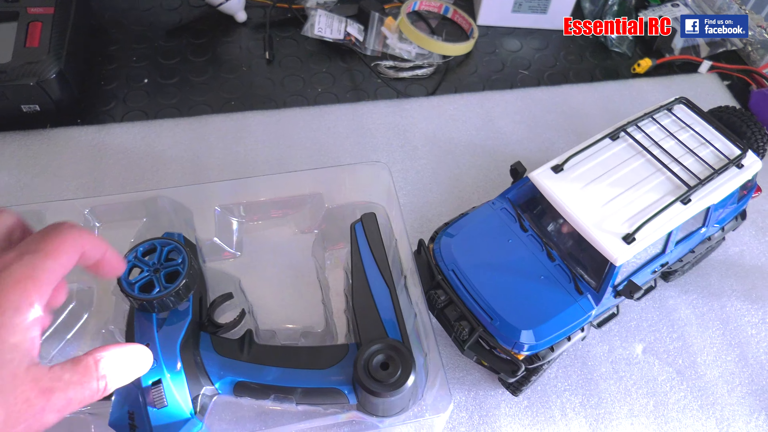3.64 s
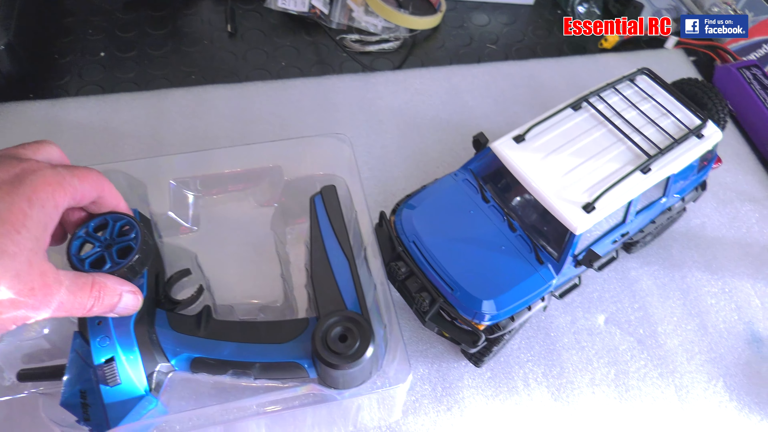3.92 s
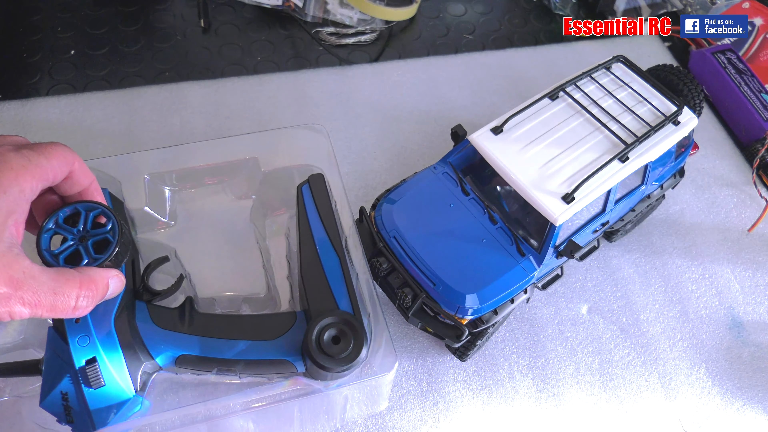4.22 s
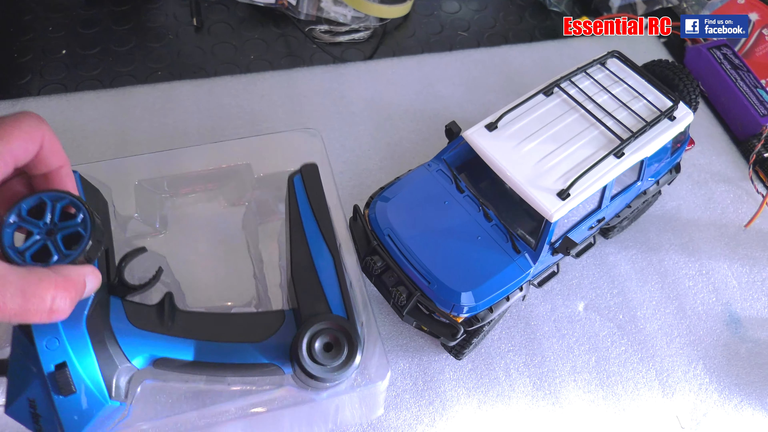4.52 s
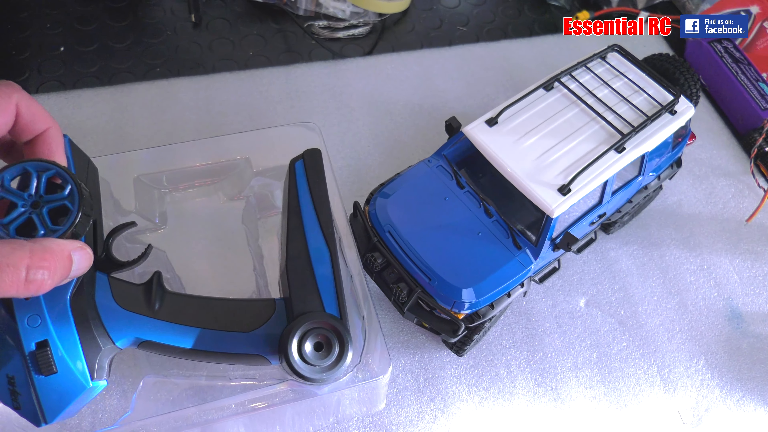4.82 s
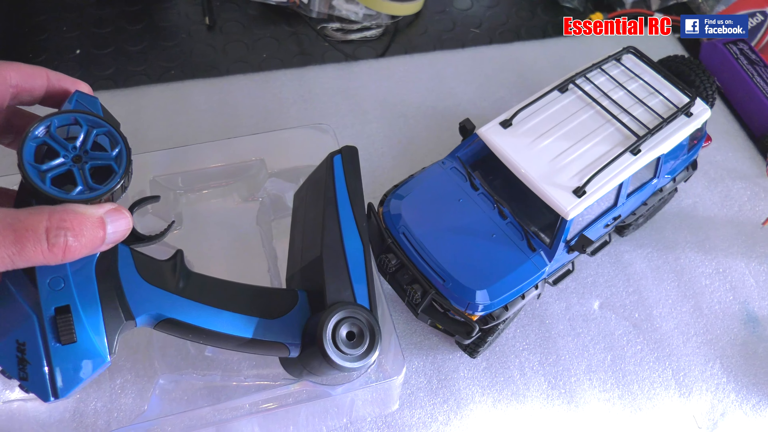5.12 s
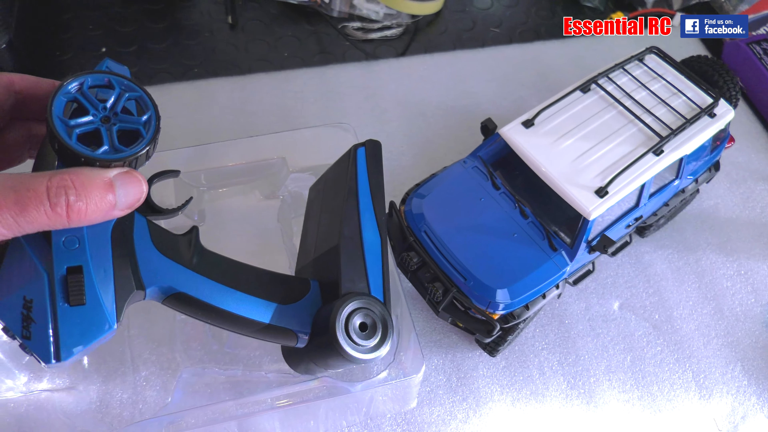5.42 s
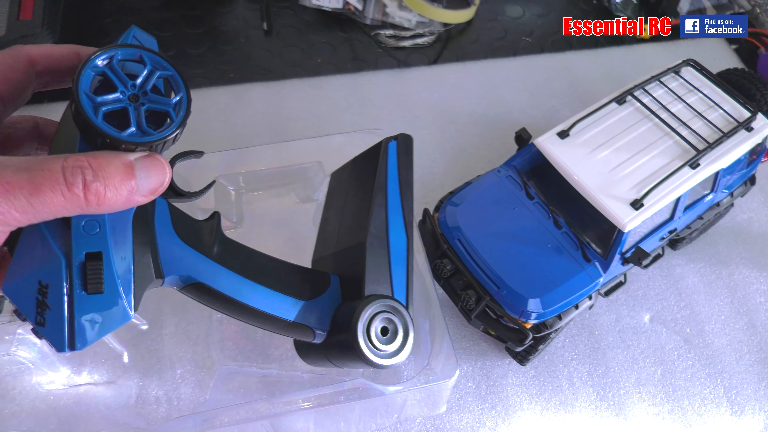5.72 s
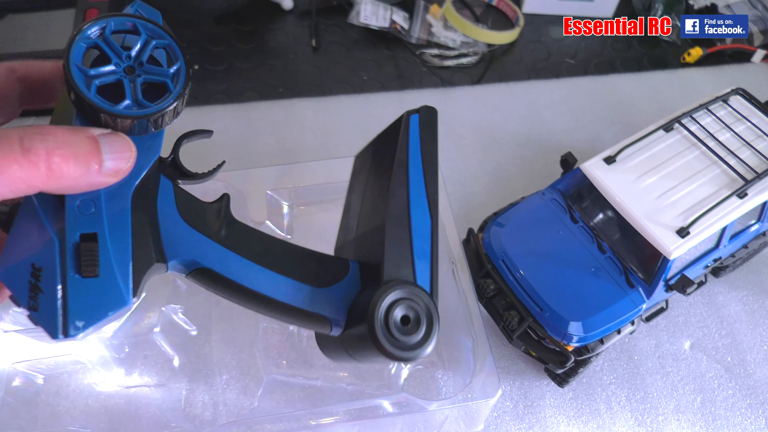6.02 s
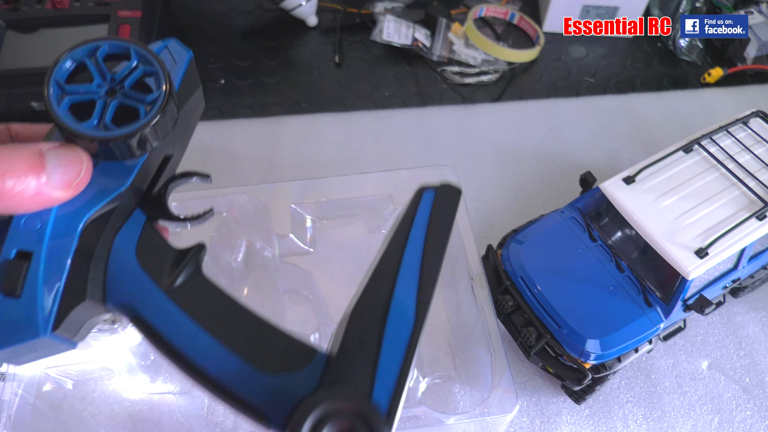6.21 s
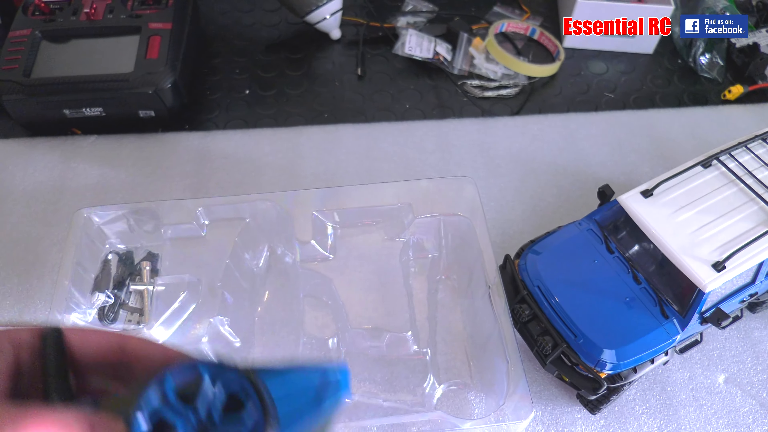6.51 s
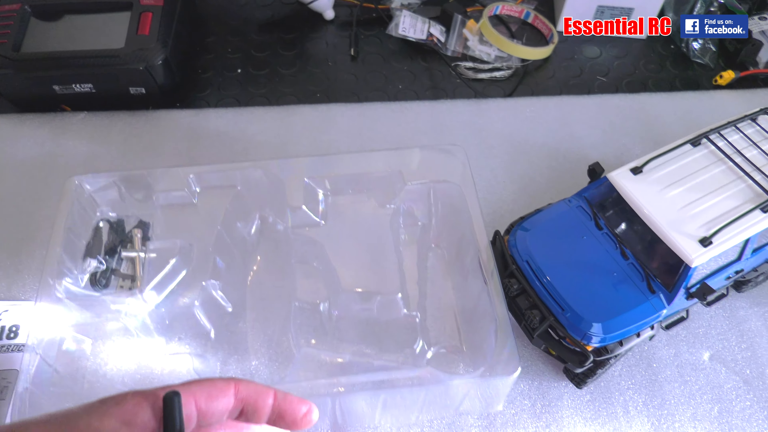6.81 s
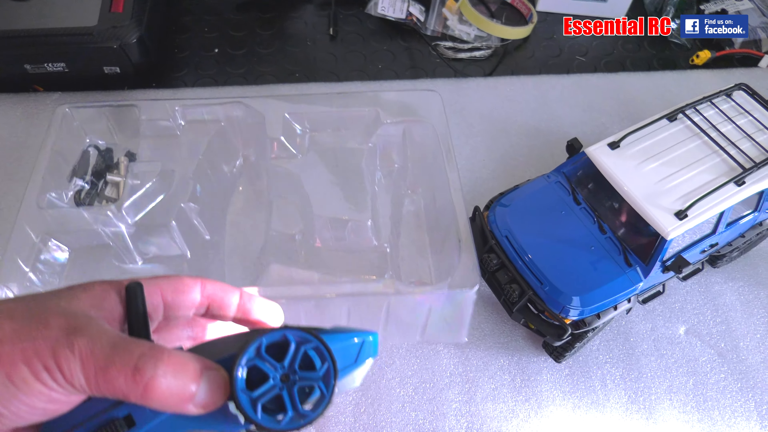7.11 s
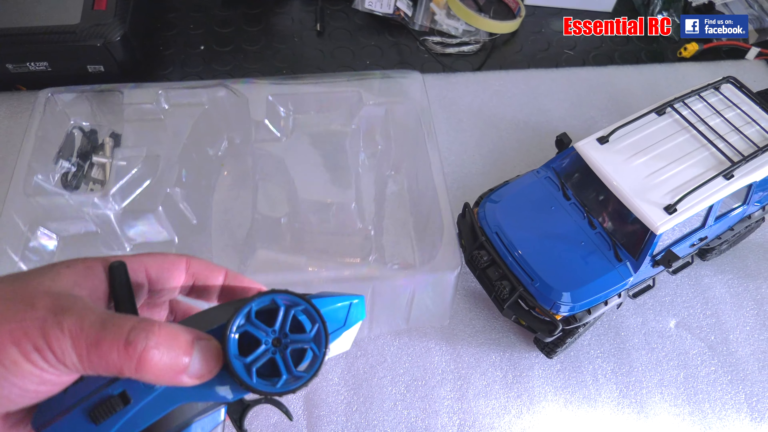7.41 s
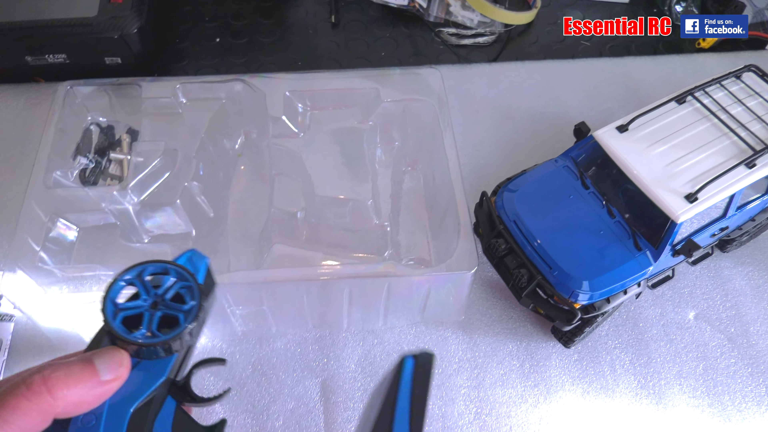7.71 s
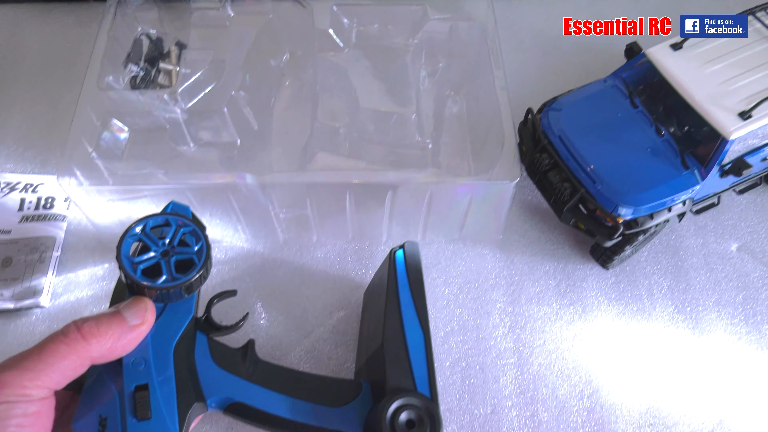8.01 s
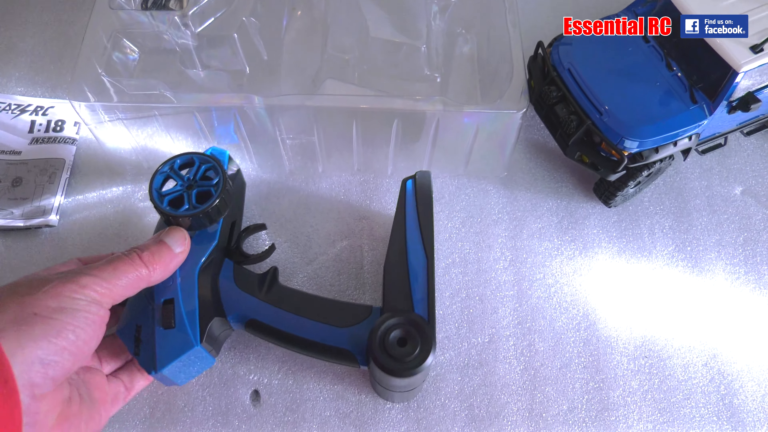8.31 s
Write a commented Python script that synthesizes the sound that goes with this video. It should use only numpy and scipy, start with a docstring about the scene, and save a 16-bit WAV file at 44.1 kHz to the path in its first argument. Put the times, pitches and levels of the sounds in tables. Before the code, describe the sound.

Close sound of a thin plastic tray being handled on a foam-covered table, with short workshop echo and faint steady air. From 0 to 1.5 seconds, rapid light hollow snaps and ticks mix with uneven creaking and brief bright finger skids. Stronger pops cluster around 1.6, and one sharp, loud snap with a low bump lands at 1.8. Sparser clicks and creaks follow, thickening again from 3.2 to 3.7. From 4.0 to 4.75 there is harder flexing, with crackling scrunches, loud snaps and dull table bumps. Isolated hollow pops fall at 5.4 and 5.6, then it calms. A soft grainy brush over foam runs from 6.1 to 6.6. From 6.85 to 7.45 the tray is shoved aside with a droning, ribbed rasp and catches, trailing until 7.7. A small bump and clicks come at 7.8, then a light hiss on foam rises from 8.1 to the end.

```python
"""A thin plastic tray creaks and gives quick hollow snaps, amid brief skids of a fingertip.
A controller is being worked loose from it on a foam-covered workshop table, which the tray bumps at times.
Later the controller brushes the foam, the tray is shoved aside with a droning rasp, and it is brushed again.
Snaps are filtered noise bursts with ringing tones; rubbing is coloured noise full of tiny clicks;
creases and bumps are fading tones. A short workshop echo and soft still air surround it all."""
import sys
import numpy as np
from scipy import signal
from scipy.fft import rfft, irfft
from scipy.io import wavfile

SR = 44100
rng = np.random.default_rng(int(sys.argv[2]) if len(sys.argv) > 2 else 0)


def wav_record(signal):
    """Record a signal, one row per channel, as 16-bit PCM in the file named by sys.argv[1]."""
    frames = np.transpose(np.atleast_2d(signal))
    bounded = np.clip(frames, -1, 1)
    # unit amplitude maps onto the largest positive 16-bit level
    quanta = np.round(bounded * 32767).astype(np.int16)
    wavfile.write(sys.argv[1], SR, quanta)


N = 372689


def from_db(db):
    """Turn decibels into a gain."""
    return 10 ** (np.asarray(db) / 20)


def rms_one(x):
    """Scale a sound to an average (rms) level of 1."""
    return x / np.sqrt(np.mean(x ** 2) + 1e-20)


def gains(rows, edge_s=0.046):
    """Join rows of time and levels into gains per sample, fading in and out beyond the two ends."""
    time_s, *columns = np.transpose(rows)
    t = np.arange(N) / SR
    edges = [time_s[0] - edge_s, time_s[0], time_s[-1], time_s[-1] + edge_s]
    inside = np.interp(t, edges, [0, 1, 1, 0])
    return [inside * from_db(np.interp(t, time_s, column)) for column in columns]


def follow(level, usual_db, share):
    """Gain of a layer: about 1 at the usual level, taking a share of the level's swing in dB."""
    return (level / from_db(usual_db) + 1e-9) ** share


def band(x, low_hz, high_hz):
    """Keep only the sound between two frequencies."""
    sos = signal.butter(3, [low_hz, min(high_hz, .45 * SR)], "band", fs=SR, output="sos")
    return signal.sosfilt(sos, x + 1e-18)


def fade(t, t60):
    """Die away smoothly, falling 60 dB in t60 seconds."""
    return np.exp(-np.log(1000) * t / t60)


def colour(x, spectrum, size=4096):
    """Shape a sound to a spectrum with a filter that does not ring ahead of time; rms 1."""
    hz, db = np.transpose(spectrum)
    grid_hz = np.linspace(1, SR / 2, size // 2 + 1)
    log_gain = np.log(from_db(np.interp(np.log(grid_hz), np.log(hz), db)))
    # folding the cepstrum forward gives the minimum-phase filter
    cepstrum = irfft(log_gain)[:size // 2]
    cepstrum[1:] *= 2
    impulse = irfft(np.exp(rfft(cepstrum, size)))
    return rms_one(signal.fftconvolve(x, impulse)[:N])


def drift(per_s):
    """Wander between random values, per_s of them a second, with a spread of about 1."""
    return np.interp(np.arange(N) / SR * per_s, np.arange(N // 10), rng.standard_normal(N // 10))


def random_clicks(per_s, spread_db):
    """Scatter single-sample clicks of uneven size and either sign."""
    sizes = from_db(spread_db * np.minimum(rng.exponential(1, N), 3)) * rng.choice([-1, 1], N)
    return sizes * (rng.random(N) < per_s / SR)


def slips(per_s, spread_db, clump_db, smooth):
    """Rub by sticking and slipping: clumps of tiny clicks over smooth friction noise."""
    clicks = rms_one(random_clicks(per_s, spread_db))
    return (clicks + smooth * rng.standard_normal(N)) * from_db(clump_db * drift(70))


def crackles(per_s, spread_db, ring_t60=0.004, count=14):
    """Flip creases at random; each rings briefly at one of several treble pitches."""
    clicks = random_clicks(per_s, spread_db)
    dealt = rng.integers(0, count, N)
    out = 0
    step_decay = fade(1 / SR, ring_t60)
    for k, pitch_hz in enumerate(np.geomspace(1600, 14000, count)):
        w = 2 * np.pi * pitch_hz / SR
        pole = step_decay ** (pitch_hz / 2000)   # higher creases die sooner
        resonator = [1, -2 * pole * np.cos(w), pole ** 2]
        ringing = signal.lfilter([1, 0, -1], resonator, clicks * (dealt == k) + 1e-18)
        out = out + np.sqrt(pitch_hz) * ringing
    return rms_one(out)


# How hard the fingers flex the tray, as the level of its creak before a small trim: time_s, level_db
FLEX = [(0.0, -40.5), (0.79, -43.5), (1.05, -47.5), (1.15, -43), (1.44, -41), (1.59, -36.5), (1.84, -49.5),
        (1.97, -41), (2.15, -38), (2.32, -40), (2.4, -82), (2.56, -49), (2.84, -49), (2.97, -59),
        (3.4, -43), (3.52, -43), (3.71, -56), (3.91, -61), (3.96, -44), (4.11, -42), (4.19, -28),
        (4.49, -39), (4.72, -39), (4.88, -37), (5.08, -61), (5.29, -48.5), (5.55, -54.5), (5.62, -49),
        (5.77, -54), (5.9, -68)]
# Tone colour of the creak: pitch_hz, relative_level_db (per Hz)
CREAK_COLOUR = [(120, -39), (200, -15), (322, -4), (390, -5), (427, 0.5), (600, 2), (736, -9), (913, -2),
                (988, -10), (1110, -6), (1490, -13.5), (2110, -24.5), (3000, -22.5), (3900, -42),
                (6600, -120)]
# Tone colour of the crinkling hiss: pitch_hz, relative_level_db
CRINKLE_COLOUR = [(760, -22), (1300, -2.5), (2110, -21.5), (2520, -8.5), (2980, -22), (3760, -10.5),
                  (4080, -9), (5370, -10.5), (5960, -7), (6550, -13.5), (10600, -14), (16000, -26)]
# Tone colour of the low rumble, shared with the dragging: pitch_hz, relative_level_db
RUMBLE_COLOUR = [(24, -42.5), (40, -31), (73, -25), (91, -8), (189, -9.5), (227, -5.5), (300, -3),
                 (390, -24.5), (660, -120)]
USUAL_FLEX_DB = -40.5
JERK_DB, JERKS_PER_S = 2, 22   # the grip sticks and slips, so the creak comes in spurts


def flexing(rumble_db=-53, rumble_share=.6, creak_db=-4, crinkle_db=-60, crinkle_share=0.89, crease_db=-50):
    """Small slips make the tray creak low and hiss high; under more force its creases crackle too."""
    force = gains(FLEX)[0] * from_db(JERK_DB * drift(JERKS_PER_S))
    scrunch_creak, scrunch_crinkle = scrunching()
    creak = from_db(creak_db) * force + scrunch_creak
    rumble = from_db(rumble_db) * follow(creak, USUAL_FLEX_DB, rumble_share)
    crinkle = from_db(crinkle_db) * follow(force, USUAL_FLEX_DB, crinkle_share) + scrunch_crinkle
    rub = slips(per_s=500, spread_db=4, clump_db=3, smooth=.5)
    hiss = slips(per_s=3000, spread_db=2, clump_db=2, smooth=1)
    creases = colour(crackles(per_s=380, spread_db=3.5), CRINKLE_COLOUR)
    # louder crinkling is more crackle and less hiss
    crease_share = np.clip(crinkle / from_db(crease_db), 0, .7)
    treble = np.sqrt(1 - crease_share) * colour(hiss, CRINKLE_COLOUR) + np.sqrt(crease_share) * creases
    low = rumble * colour(rub, RUMBLE_COLOUR) + creak * colour(rub, CREAK_COLOUR)
    return low + crinkle * treble


# Tone colour of the still air: pitch_hz, relative_level_db
AIR_COLOUR = [(15, -43), (25, -16.5), (58, -24), (114, -3.5), (185, -8), (263, -0.5), (439, -5),
              (624, -5.5), (734, -10.5), (1160, -7.5), (2280, -19), (10700, -21.5), (16000, -23)]
AIR_DB = -58


def still_air():
    """The quiet room is steady random noise with its own tone colour."""
    return from_db(AIR_DB) * colour(rng.standard_normal(N), AIR_COLOUR)


# Fingertips skidding on the sheet and on the controller: start_s, length_s, level_db (halfway through)
SKIDS = [(.005, 0.047, -50), (0.207, 0.048, -77), (0.285, 0.038, -52.5), (0.59, 0.033, -55),
         (0.938, 0.078, -51.5), (1.11, 0.047, -51), (1.563, 0.086, -62), (1.776, 0.034, -44.5),
         (1.83, .2, -56), (2.178, .14, -52.5), (2.448, 0.14, -62.5), (2.7, 0.078, -59),
         (2.89, 0.062, -51.5), (3.088, 0.057, -51), (3.217, 0.13, -68), (3.74, 0.072, -60.5),
         (3.867, 0.4, -60.5), (4.14, 0.19, -54), (4.467, .035, -47), (4.557, 0.1, -40.5),
         (4.92, 0.27, -56.5), (5.258, 0.2, -57), (5.555, 0.16, -56.5), (5.859, 0.14, -53),
         (7.852, 0.056, -55), (8.071, 0.033, -47.5)]
# Tone colour of a skid: pitch_hz, relative_level_db
SKID_COLOUR = [(1180, -47), (2000, -8.5), (3280, -10), (5730, -1.5), (6140, -6.5), (11000, -2.5),
               (12400, -7.5), (16000, -17)]
SKID_SWELL_DB = 4.5   # each skid grows this much as the finger speeds up


def skidding():
    """A sliding fingertip slips thousands of times a second, heard as a short bright hiss."""
    level = 0
    for start_s, length_s, level_db in SKIDS:
        begin = (start_s, level_db - SKID_SWELL_DB / 2)
        end = (start_s + length_s, level_db + SKID_SWELL_DB / 2)
        level = level + gains([begin, end], edge_s=0.0047)[0]
    return level * colour(slips(per_s=4000, spread_db=2.5, clump_db=1.2, smooth=.8), SKID_COLOUR)


# Ringing tones of the whole tray: pitch_hz, relative_level_db, t60_s (time to fall 60 dB)
TRAY_MODES = [(222, -14, .09), (342, -7, .12), (398, -6, .11), (470, -5, .06), (530, -3, .06),
              (592, 0, .08), (675, -4, .05), (808, -1, .08), (920, 0, .05), (1071, -3, .06),
              (1200, -6, .035), (1400, -8, .03)]


def panel_ring(t, pitch_hz, give, panel_t60=0.045, panel_db=7, scatter_db=3):
    """A snapping part rings at its own pitch and shakes each tone of the tray by chance."""
    mode_hz, mode_db, mode_t60 = np.transpose(TRAY_MODES)[:, :, None]
    shape = (len(pitch_hz), len(mode_hz))
    strength = from_db(mode_db.T + scatter_db * rng.standard_normal(shape)) * rng.choice([-1, 1], shape)
    tray = strength @ (np.sin(2 * np.pi * mode_hz * t) * fade(t, mode_t60)) / 2
    panel = np.sin(2 * np.pi * pitch_hz * t) * fade(t, panel_t60 * give)
    return tray * np.sqrt(give) + from_db(panel_db) * panel


# Snaps and ticks of the tray: panels buckling, ribs catching in the drag, small contacts.
# Levels are before the trim of each part of the snap: start_s, ring_db (hollow ring), pitch_hz (of the ring),
# give (length of the give, 1 = usual snap), crack_db, tick_db
SNAPS = [(0.007, -22, 442, 1.1, -45, -47), (0.042, -18.5, 610, 0.92, -40.5, -51),
         (0.098, -16, 522, 0.83, -36, -36), (0.136, -24.5, 518, 1.1, -57, -64),
         (0.19, -26, 471, 0.91, -56, -63), (0.213, -24.5, 510, 0.97, -49, -67),
         (0.244, -24, 627, 0.78, -56, -66), (0.344, -24.5, 550, 0.76, -44.5, -53),
         (0.416, -21, 613, 1.2, -40, -48), (0.449, -37, 470, 1.1, -39, -37.5),
         (0.461, -26, 575, 1.4, -49, -52), (0.484, -23.5, 617, 0.87, -49, -56),
         (0.521, -28, 585, 1.3, -51, -44.5), (0.581, -35, 759, 1.1, -52, -46),
         (0.59, -25.5, 600, 0.9, -44, -41), (0.624, -28, 990, 0.95, -41, -42),
         (0.669, -31, 547, 1.2, -63, -69), (0.691, -33, 506, 1.2, -51, -45), (0.726, -24, 500, 1, -49, -56),
         (0.749, -21.5, 577, 1.4, -48, -51), (0.793, -31, 896, 2, -46, -43.5),
         (0.845, -21.5, 620, 0.93, -41, -53), (0.853, -17, 588, 1.1, -43, -51),
         (0.877, -21.5, 580, 1.3, -46, -39), (0.952, -19, 615, 1.4, -34, -33.5),
         (1.078, -48, 506, 0.69, -46, -49), (1.099, -22.5, 532, 1.6, -44, -45),
         (1.111, -18, 920, 1.2, -38, -48), (1.118, -21.5, 361, 1.1, -33, -33),
         (1.192, -27.5, 440, 1.7, -39, -42), (1.242, -17, 534, 1.26, -37.5, -33.5),
         (1.273, -20.5, 554, 1.3, -44, -48), (1.287, -17, 392, 0.82, -37, -41),
         (1.368, -23.5, 574, 1.6, -51, -45.5), (1.399, -30, 560, 1.9, -38, -37),
         (1.454, -23.5, 590, 0.97, -39, -52), (1.564, -15.5, 606, 1.06, -39, -43),
         (1.581, -11, 597, 1.3, -34, -40.5), (1.602, -13.5, 920, 1.4, -38.5, -39),
         (1.621, -18, 904, 1.1, -39, -42), (1.77, -8.5, 595, 1.32, -32.5, -32.5),
         (1.811, 0, 783, 0.87, -18.5, -16), (1.927, -22, 587, 0.82, -34, -35),
         (2.059, -13, 1075, 1.2, -29.5, -43), (2.125, -32, 460, 1.1, -61, -37),
         (2.214, -19, 597, 1.4, -36, -36), (2.262, -16.5, 520, 0.92, -24, -42),
         (2.441, -24.5, 864, 1.5, -47.5, -47), (2.658, -25, 539, 1.7, -43, -51),
         (2.699, -23, 536, 1.55, -57, -54), (2.771, -28, 444, 0.92, -47, -49),
         (2.882, -21.5, 790, 1.2, -35.5, -36), (2.957, -30, 566, 1.24, -36, -48),
         (3.065, -18, 490, 1.3, -44, -45), (3.085, -18.5, 651, 0.67, -34.5, -29.5),
         (3.158, -41, 537, 0.82, -51, -45), (3.184, -10, 585, 0.63, -33, -53),
         (3.26, -27, 510, 1.5, -57, -61), (3.281, -26, 515, 1.3, -49, -53),
         (3.354, -17, 454, 1.6, -42, -58), (3.368, -26.5, 479, 1.1, -57, -35),
         (3.379, -21.5, 633, 0.6, -43, -41), (3.41, -13, 645, 1.1, -32.5, -26.5),
         (3.559, -18.5, 1150, 0.85, -21.5, -35), (3.568, -22, 646, 0.81, -47, -28.5),
         (3.63, -15.5, 646, 1.06, -39.5, -43.5), (3.802, -33, 396, 0.9, -60, -53),
         (3.917, -28.5, 430, 0.4, -67, -59), (3.957, -28.5, 490, 1.1, -46.5, -48),
         (3.99, -24.5, 503, 1, -37, -41), (4.009, -12.5, 607, 0.99, -34.5, -38.5),
         (4.082, -17.5, 513, 0.92, -51, -54), (4.113, -14.5, 587, 1.2, -36.5, -37),
         (4.216, -16.5, 907, 1.9, -31, -29), (4.374, -16.5, 1140, 0.96, -26.5, -27.5),
         (4.482, -20.5, 580, 1.3, -36, -38), (4.587, -14, 565, 1.6, -44, -36),
         (4.602, -11, 860, 0.79, -27, -28), (4.612, -16, 597, 0.72, -26, -27),
         (4.638, -8.5, 534, 1.2, -30, -33), (4.75, -17, 1104, 0.73, -27.5, -41),
         (4.811, -30, 659, 1, -41, -28.5), (4.928, -53, 980, 1.6, -52, -42), (5.066, -31, 624, 1, -43, -53),
         (5.406, -17, 350, 0.85, -32.5, -35), (5.41, -7.5, 513, 1.4, -39, -33.5),
         (5.559, -39, 350, 0.69, -51, -54), (5.611, -15.5, 631, 2.13, -39.5, -48),
         (5.617, -13, 598, 2, -49, -46), (5.676, -16.5, 655, 1.56, -36, -38.5),
         (5.78, -44, 810, 1.1, -52, -47), (6.014, -48.5, 829, 0.99, -54, -45),
         (6.796, -13, 388, 1.08, -29.5, -35), (6.953, -10, 797, 1, -22, -43),
         (7.11, -13.5, 657, 1, -23.5, -27), (7.162, -11.5, 807, 1.2, -27, -32),
         (7.302, -15, 654, 1.4, -22.5, -27), (7.829, -10, 385, 1.02, -34, -33),
         (7.988, -38, 589, 1.1, -44, -42)]
# The four parts of a snap (thud, hollow ring, crack, tick): low_hz, high_hz, blow_t60_s (for a usual snap),
# linger_db (share that lingers in the sheet), linger_t60_s, click_share (of the opening click, a plain factor)
SNAP_PARTS = [(118.4, 322, 0.03, -16.5, 0.14, -1.5), (308, 1115, 0.0069, -17.5, 0.083, -1.5),
              (1390, 3710, 0.029, -22.5, 0.22, -1.5), (4500, 11500, 0.012, -19.5, 0.11, 1)]
# a snap's thud follows its ring, and is stronger for the larger, lower panels
THUD_DB, THUD_DB_PER_OCTAVE, USUAL_PANEL_HZ = -16.5, -4.5, 560


def snaps(part_db=(-10.5, -10.5, -7, -7.5), flutter=0.63, rise_t60=0.0025, crackle_db=3):
    """Each snap is a click and a burst that crackles on faintly; a slow give swells and lasts longer."""
    t = np.arange(SR // 7) / SR
    attack = int(.016 * SR)
    rows = np.vstack([SNAPS, lesser_snaps()])
    start_s, ring_db, pitch_hz, give, crack_db, tick_db = rows.T[:, :, None]
    thud_db = ring_db + THUD_DB + THUD_DB_PER_OCTAVE * np.log2(pitch_hz / USUAL_PANEL_HZ)
    levels_db = thud_db, ring_db, crack_db, tick_db
    give = np.maximum(give, .1)
    swell = 1 - fade(t, rise_t60 * give ** 2)
    # the crackle takes a new random level every 50 samples
    steps = rng.standard_normal((len(rows), len(t) // 50))
    crackle = from_db(crackle_db * np.repeat(steps, 50, axis=1))
    grit = rng.standard_normal(swell.shape) * crackle * swell
    click = np.arange(len(t)) == np.round(.0007 * SR * give)   # just after the plastic starts to give
    sounds = 0
    for k, (low_hz, high_hz, blow_t60, linger_db, linger_t60, click_share) in enumerate(SNAP_PARTS):
        decay = fade(t, blow_t60 * np.sqrt(give)) + from_db(linger_db) * fade(t, linger_t60)
        part = band(grit * decay + click_share * click, low_hz, high_hz)
        if k == 1:   # the hollow part is mostly ringing
            ringing = band(swell * panel_ring(t, pitch_hz, give), 200, 2000)
            part = flutter * rms_one(part) + rms_one(ringing)
        # levels are set over the first 16 ms
        loudness = np.std(part[:, :attack], axis=1, keepdims=True)
        sounds = sounds + from_db(levels_db[k] + part_db[k]) * part / loudness
    out = np.zeros(N + len(t))
    starts = np.maximum(start_s[:, 0] * SR, 0).astype(int)
    for at, sound in zip(starts, sounds):
        out[at:at + len(t)] += sound
    return out[:N]


# lesser snaps: ring relative to the flexing level, crack and tick relative to the ring
LESSER_PER_S, LESSER_DB, LESSER_CRACK_DB, LESSER_TICK_DB = 7, 10, -24, -21


def lesser_snaps(spread_db=3, spread_octaves=0.2):
    """Chance snaps while the tray is flexed, stronger with the flexing; columns as in SNAPS."""
    flex_s, flex_db = np.transpose(FLEX)
    chance = rng.standard_normal((200, 4))
    start_s = np.cumsum(rng.uniform(.3, 1.7, 200)) / LESSER_PER_S
    ring_db = np.interp(start_s, flex_s, flex_db) + LESSER_DB + spread_db * chance[:, 0]
    pitch_hz = USUAL_PANEL_HZ * 2 ** (spread_octaves * chance[:, 1])
    give = 2 ** (.5 * chance[:, 2])
    sharp_db = ring_db + spread_db * chance[:, 3]
    crack_db, tick_db = sharp_db + LESSER_CRACK_DB, sharp_db + LESSER_TICK_DB
    rows = np.column_stack([start_s, ring_db, pitch_hz, give, crack_db, tick_db])
    return rows[start_s < flex_s[-1]]


# Workshop echo, one row per range of pitch: low_hz, high_hz, level_db, t60_s
ECHO_BANDS = [(75.6, 510, -10.5, 0.34), (320, 1760, -9.5, 0.23), (1520, 3600, -11, 0.26),
              (4620, 20000, -26.5, 0.29)]


def workshop(x, first_echo_s=0.0045):
    """Table and walls return a blur of echoes, made of fading noise in four ranges of pitch."""
    t = np.arange(SR // 2) / SR
    echo = 0
    for low_hz, high_hz, level_db, t60 in ECHO_BANDS:
        tail = rng.standard_normal(len(t)) * fade(t, t60) * (t > first_echo_s)
        echo = echo + from_db(level_db) * band(tail / np.linalg.norm(tail), low_hz, high_hz)
    return signal.fftconvolve(x, echo)[:N]


# Scrunches of the tray: the controller rubbing in its pocket, and at the end the tray settling:
# start_s, length_s, creak_db, crinkle_db
SCRUNCHES = [(0.369, 0.12, -38, -53.5), (1.389, 0.017, -33.5, -43.5), (1.837, 0.12, -29.5, -44.5),
             (2.263, .025, -44, -57), (2.672, 0.07, -46, -67), (2.954, 0.036, -39, -56.5),
             (3.532, 0.034, -37, -48), (4.208, 0.019, -31.5, -39.5), (4.351, 0.017, -36, -39),
             (4.483, 0.047, -39.5, -59), (4.554, 0.097, -28.5, -38), (5.413, 0.018, -40, -49),
             (7.781, 0.013, -50, -49.5), (7.848, 0.093, -52, -56)]
SCRUNCH_ATTACK_S, SCRUNCH_T60_S = .012, 0.23


def scrunching():
    """Give the creak and crinkle gains of the scrunches: each swells, holds and dies away."""
    t = np.arange(N) / SR
    start_s, length_s, *levels_db = np.transpose(SCRUNCHES)[:, :, None]
    attack = np.clip((t - start_s) / SCRUNCH_ATTACK_S, 0, 1)
    decay = fade(np.maximum(t - start_s - length_s, 0), SCRUNCH_T60_S)
    return np.sum(from_db(levels_db) * attack * decay, axis=1)


# The tray bumping the table: start_s, pitch_hz, level_db (before fading), t60_s
BUMPS = [(1.815, 61.3, -28, 0.058), (4.224, 99, -30, 0.17), (4.606, 86, -36.5, 0.29),
         (5.413, 200, -27.5, 0.096), (5.68, 146, -42, 0.2), (7.524, 80.6, -36, 0.15),
         (7.832, 94, -53, 0.12)]


def bumping():
    """The tray bumps the table, which answers with low fading tones."""
    t = np.arange(SR // 3) / SR
    out = np.zeros(N + SR)
    for start_s, pitch_hz, level_db, t60 in BUMPS:
        at = int(start_s * SR)
        out[at:at + len(t)] += from_db(level_db) * np.sin(2 * np.pi * pitch_hz * t) * fade(t, t60)
    return out[:N]


# Controller and forearm brushing over the foam, one list per stroke, levels before a small trim:
# time_s, murmur_db, hiss_db
BRUSH_STROKES = [
    [(6.06, -69, -68), (6.154, -50.5, -49), (6.38, -46.5, -48.5), (6.518, -70, -53), (6.55, -56, -57),
     (6.7, -84, -75)],
    [(8.13, -73, -58), (8.214, -77, -50), (8.224, -52, -47), (8.304, -72, -46.5), (8.31, -63, -46),
     (8.45, -61, -41)],
]
# Tone colour of the murmur on foam: pitch_hz, relative_level_db
MURMUR_COLOUR = [(180, -76), (300, -34), (539, -1.5), (862, -9.5), (1000, -2.5), (1680, -13), (2500, -36),
                 (3250, -17.5), (5500, -120)]
# Tone colour of the hiss on foam: pitch_hz, relative_level_db
FOAM_HISS_COLOUR = [(1060, -41), (1800, -8), (2520, -6.5), (2900, -10), (3540, -4), (5200, 0.5),
                    (6900, -3.5), (10800, -1), (16000, -16)]


def brushing(murmur_db=0.5, hiss_db=-1):
    """Light rubbing on foam gives a fine grainy hiss over a soft murmur."""
    murmur, hiss = np.sum([gains(stroke) for stroke in BRUSH_STROKES], axis=0)
    rub = slips(per_s=2800, spread_db=5.5, clump_db=1.7, smooth=0.94)
    low = from_db(murmur_db) * murmur * colour(rub, MURMUR_COLOUR)
    return low + from_db(hiss_db) * hiss * colour(rub, FOAM_HISS_COLOUR)


# Speed of the tray as it is shoved over the foam, as the level of its drone before a small trim:
# time_s, level_db
DRAG = [(6.85, -39.5), (6.89, -25.5), (6.932, -27), (6.95, -23.5), (7.332, -20), (7.472, -47),
        (7.534, -30.5), (7.72, -74)]
# Tone colour of the drone: pitch_hz, relative_level_db
DRONE_COLOUR = [(94, -55), (160, -30), (200, -13.5), (281, -10), (427, -12), (488, -5.5), (648, -5.5),
                (732, -7), (798, -3), (1110, -11.5), (1300, -11), (1490, -21), (3000, -29), (3900, -45),
                (6600, -120)]
# Tone colour of the rasp: pitch_hz, relative_level_db
RASP_COLOUR = [(1060, -20.5), (1800, -0.5), (2430, -12.5), (3480, -3), (3910, -5.5), (4830, -0.5),
               (6780, -6.5), (10800, -8), (15300, -17.5), (16000, -31)]
USUAL_DRAG_DB = -21.5
# the ribs catch at even steps: time of one catch, time between two, swing of the rasp up and down
RIB_AT_S, RIB_STEP_S, RIB_DB = 7.305, 0.0453, 2.5


def dragging(rumble_db=-45, rumble_share=.5, drone_db=-1.9, rasp_db=-31, rasp_share=1.2, flurry_db=1.0):
    """Dense slips on the foam drive the hollow tray; its ribs catch and rasp in flurries."""
    speed, = gains(DRAG)
    rib_phase = 2 * np.pi * (np.arange(N) / SR - RIB_AT_S) / RIB_STEP_S
    ribs = from_db(RIB_DB * np.cos(rib_phase))
    rumble = from_db(rumble_db) * follow(speed, USUAL_DRAG_DB, rumble_share)
    rasp = from_db(rasp_db) * ribs * follow(speed, USUAL_DRAG_DB, rasp_share)
    rub = slips(per_s=3000, spread_db=3, clump_db=1.2, smooth=.7)
    catches = crackles(per_s=900, spread_db=3.5) * from_db(flurry_db * drift(120))
    drone = from_db(drone_db) * speed * colour(rub, DRONE_COLOUR)
    return rumble * colour(rub, RUMBLE_COLOUR) + drone + rasp * colour(rub + catches, RASP_COLOUR)


def scene():
    """Add up the tray and table sounds, their echo and the still air of the room."""
    tray = snaps() + bumping() + flexing() + skidding() + dragging() + brushing()
    air = still_air()
    return (tray + workshop(tray) + air)[None]


CUTOFF_HZ = 16800


def record(dry):
    """Flatten any overloading peaks, then cut the very top of the treble."""
    treble_cut = signal.cheby2(20, 80, CUTOFF_HZ, fs=SR, output="sos")
    return signal.sosfilt(treble_cut, np.clip(dry, -.93, .93))


dry = scene()
out = record(dry)
wav_record(out)
```